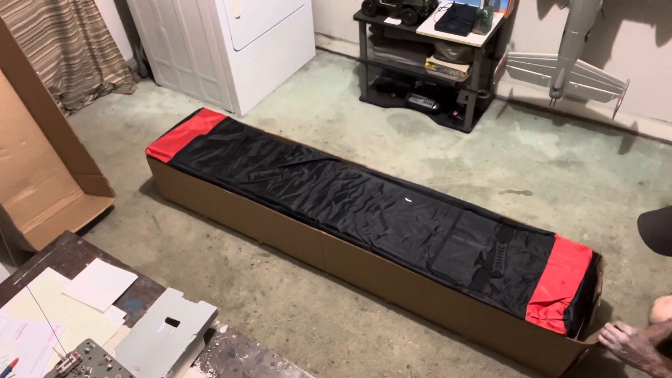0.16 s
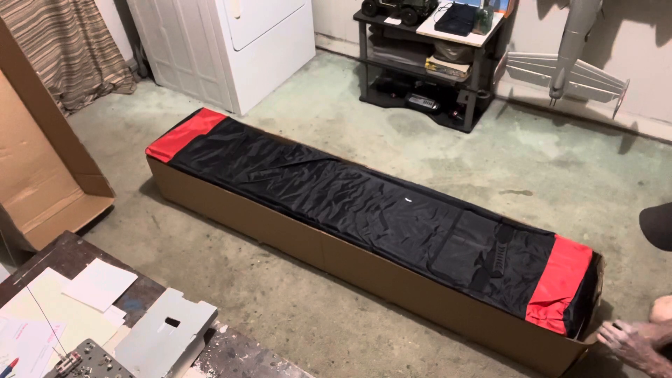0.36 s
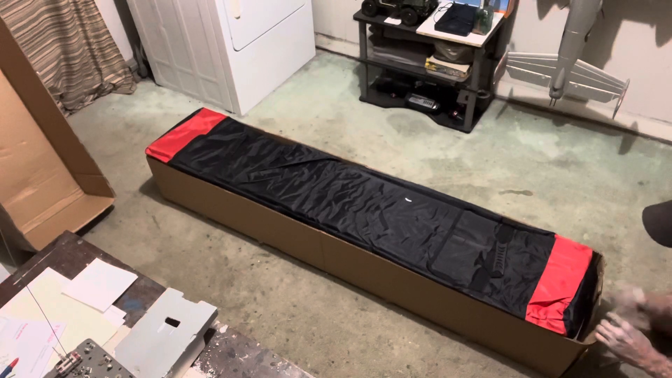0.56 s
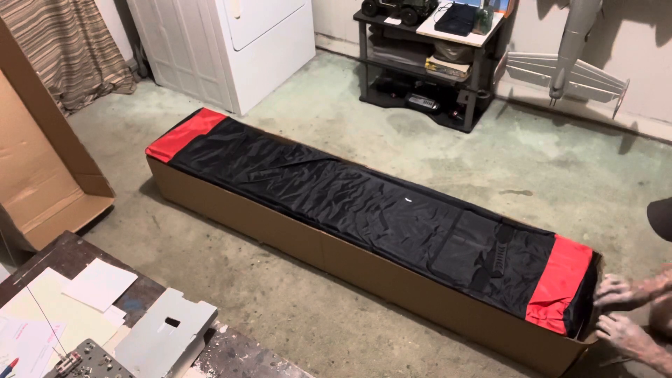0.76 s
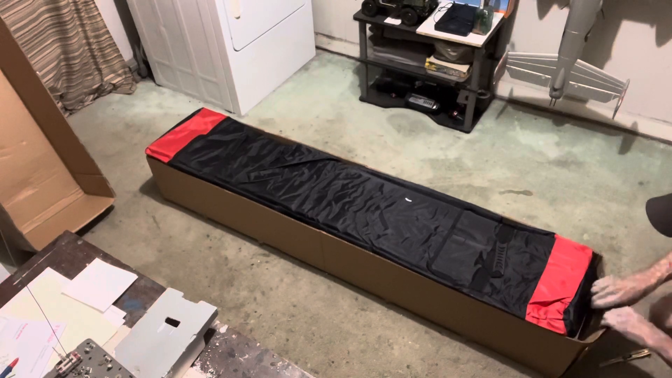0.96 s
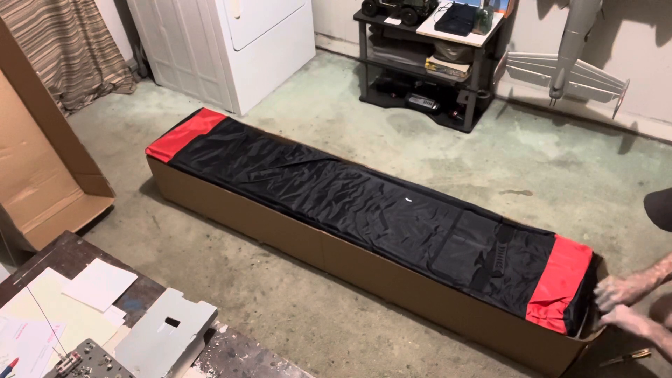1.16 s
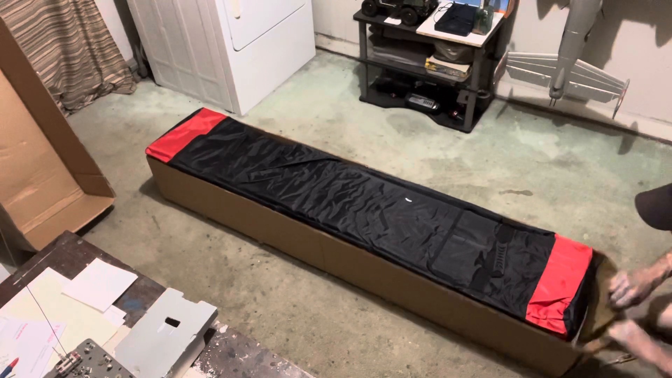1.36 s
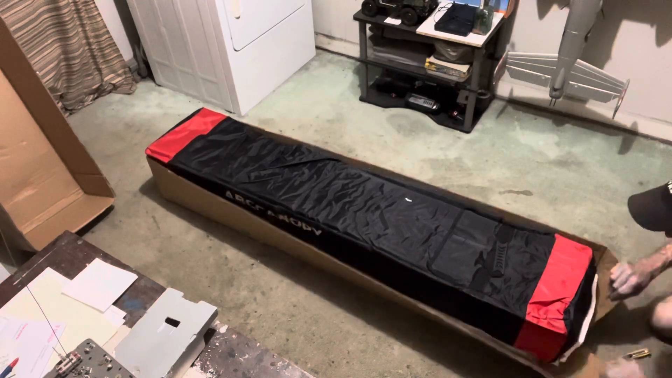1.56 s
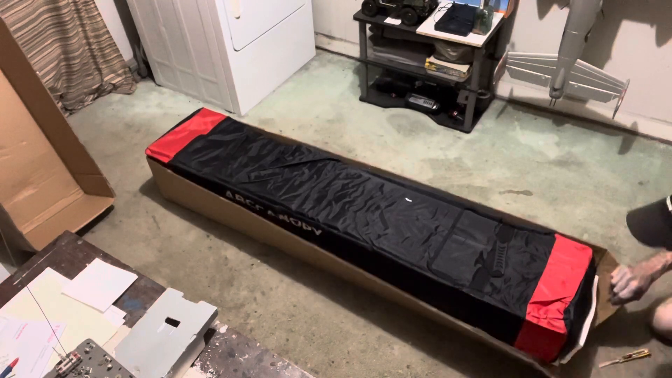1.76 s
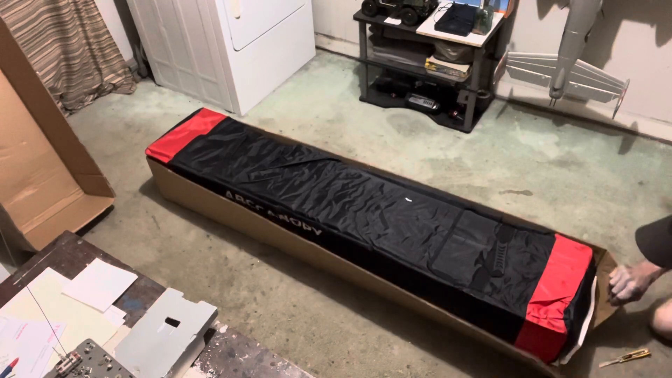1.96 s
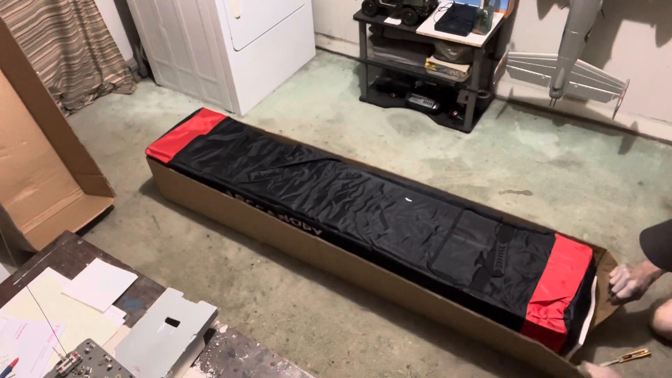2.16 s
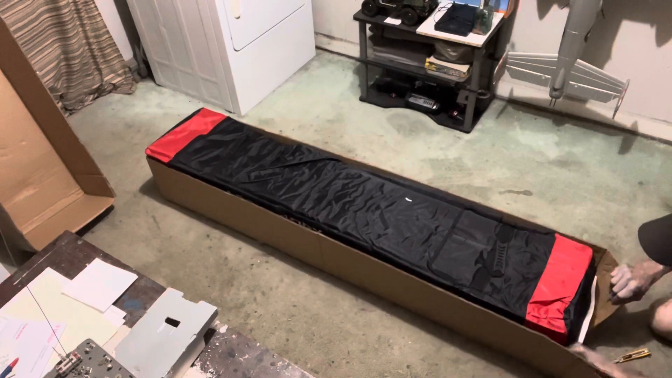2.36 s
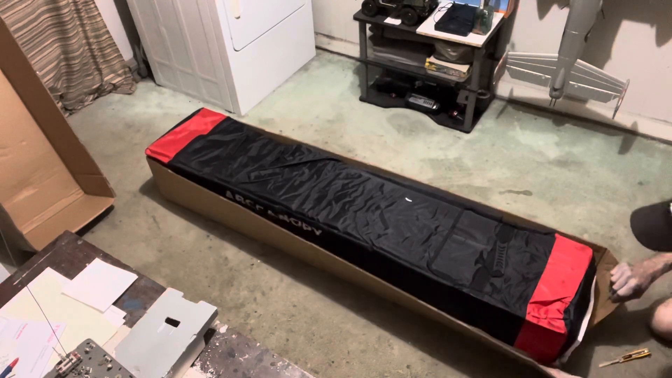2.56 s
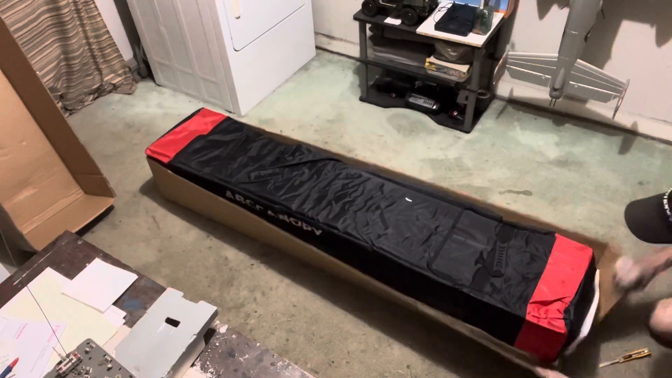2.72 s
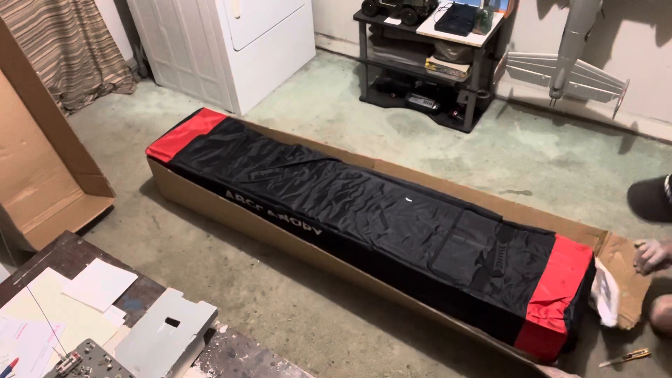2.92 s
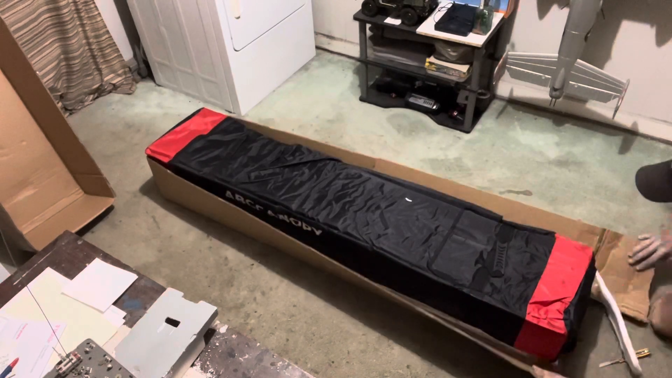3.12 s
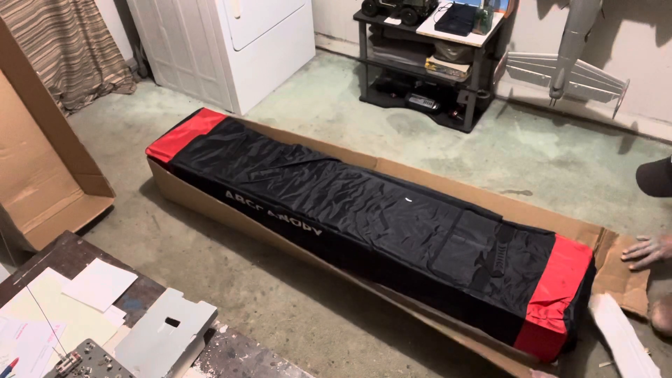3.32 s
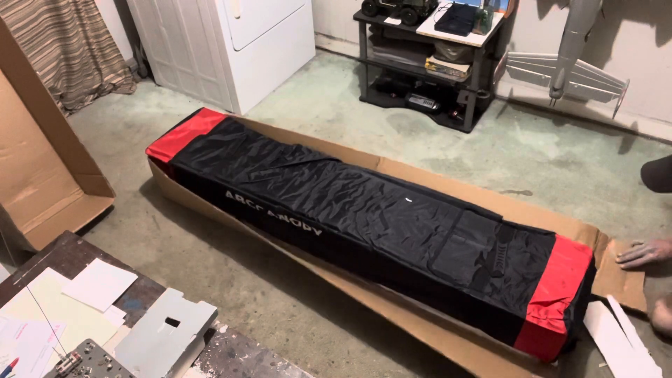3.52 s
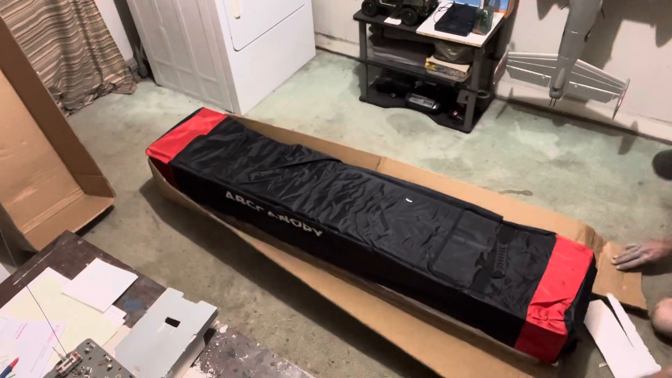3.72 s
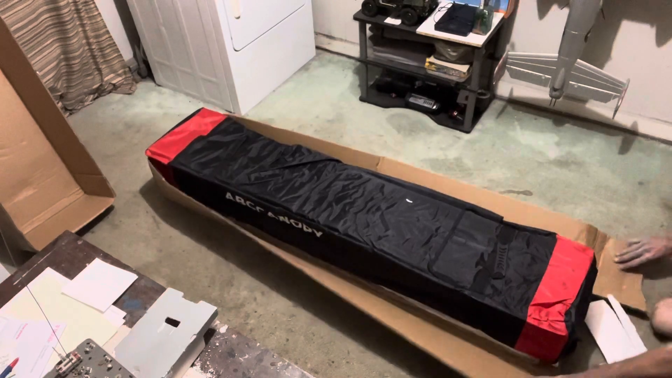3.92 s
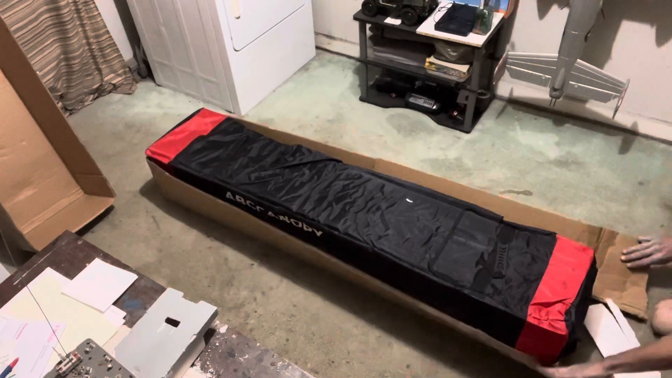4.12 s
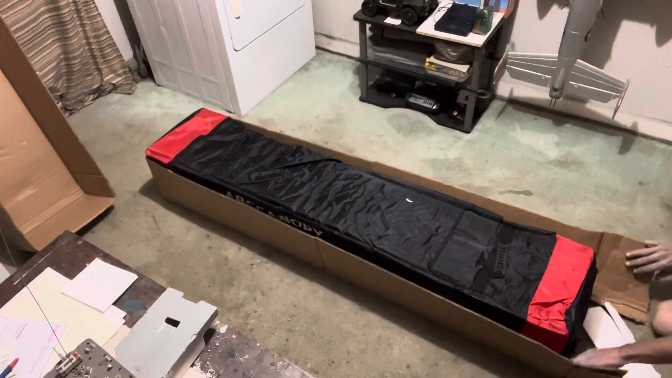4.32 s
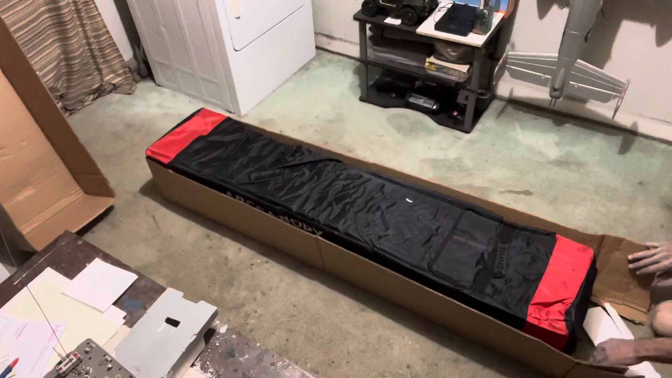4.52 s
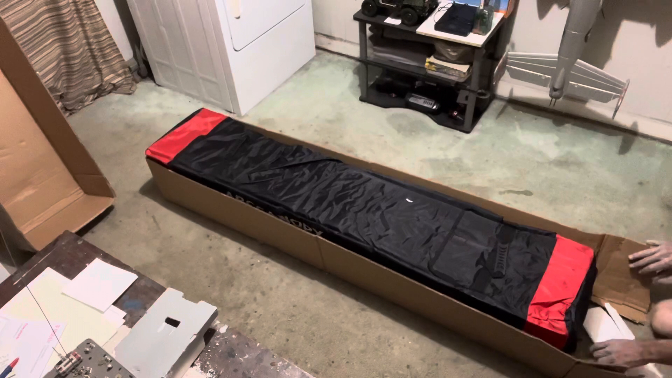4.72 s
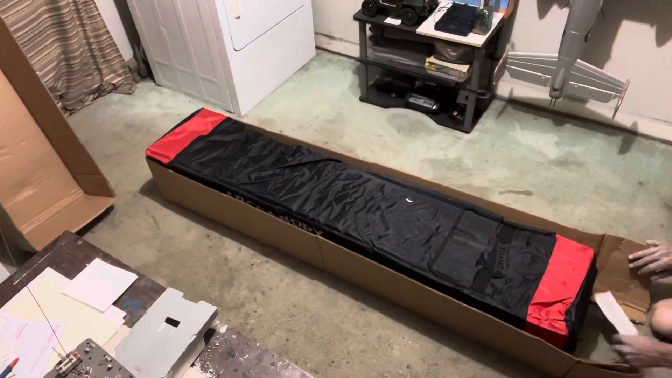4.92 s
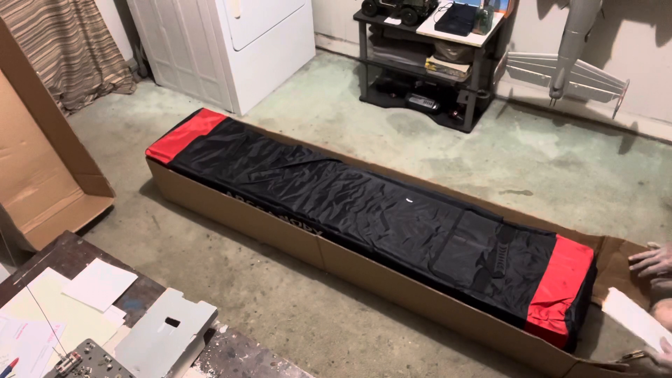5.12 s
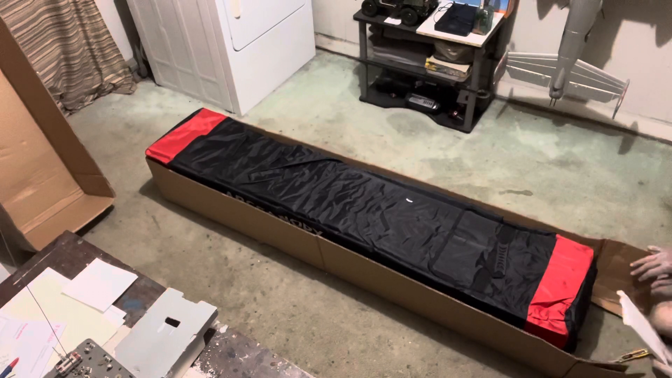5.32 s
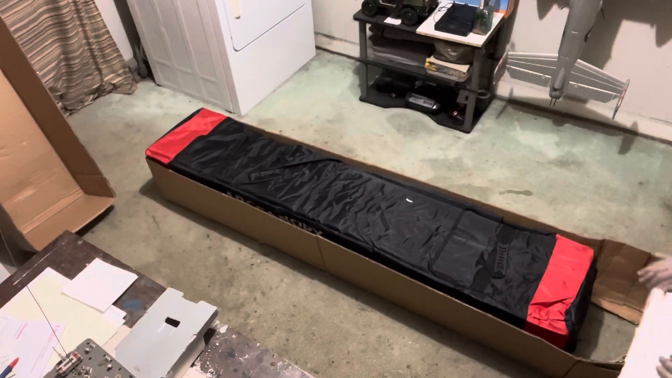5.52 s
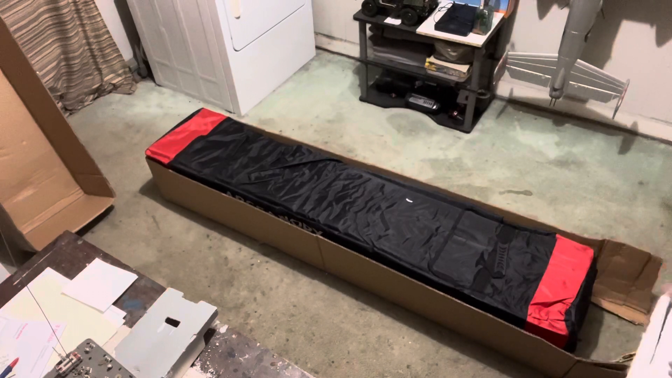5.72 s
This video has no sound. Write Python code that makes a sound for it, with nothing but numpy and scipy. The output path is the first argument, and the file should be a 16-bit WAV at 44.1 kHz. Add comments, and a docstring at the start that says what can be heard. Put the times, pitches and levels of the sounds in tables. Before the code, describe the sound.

A heavy long carton is pulled open on a concrete floor. Small slips and knocks build to a rough, boomy rip with rapid cracks, then quiet shuffling, one hard snap and deep floor thump, and afterwards scattered soft scrapes and dry papery snaps. Short garage echo, low steady room hum, close stereo pickup of a handheld kind.

```python
"""Hands tear open and fold back the end of a long cardboard box on a garage floor.
Small random slips make the fibres rasp and the board boom; single sharp steps make fibre, tape and foam snap.
Filtered noise swells as the box rocks and drags, and low fading tones are its end dropping on the floor.
Added reflections give the garage its echo, and slowly wavering noise is its low hum.
Two microphone ports hear the scene, the right one first over most of the pitch range."""
import sys
import numpy as np
from scipy import signal
from scipy.fft import rfft, irfft
from scipy.io import wavfile
from scipy.ndimage import uniform_filter1d

SR = 44100
rng = np.random.default_rng(int(sys.argv[2]) if len(sys.argv) > 2 else 0)


def generate_wav(sig):
    """Save sig (samples, or channels by samples) to the path in sys.argv[1] as 16-bit PCM at SR."""
    pcm = np.round(np.clip(np.atleast_2d(sig).T, -1, 1) * 32767).astype(np.int16)
    wavfile.write(sys.argv[1], SR, pcm)


N = 254898  # length of the scene [samples]


def gain_of(db):
    """Turns decibels into a factor for the sound pressure."""
    return 10 ** (np.asarray(db) / 20)


def evened(x):
    """Scales a signal so that its average strength (rms) is 1."""
    return x / np.sqrt(np.mean(x ** 2) + 1e-20)


def read(points, hz):
    """Reads a table between its points, on a log-frequency axis as the ear hears pitch."""
    f, value = np.transpose(points)
    return np.interp(np.log(hz + 1), np.log(f + 1), value)


def peaks(modes, hz):
    """Resonances each pass a narrow band of pitches; their powers add up."""
    power = sum(gain_of(2 * db) / (1 + (2 * (hz - f) / width) ** 2) for f, width, db in modes)
    return np.sqrt(power)


def split(hz, edge_hz, upper):
    """Shares the power between the part over an edge and the part under it."""
    share = 1 / (1 + (edge_hz / (hz + 1)) ** 4)
    return np.sqrt(share if upper else 1 - share)


def colour(x, gain):
    """Filters with the tone curve gain(hz); the response starts at once and has a total power of 1."""
    log_gain = np.log(gain(abs(np.fft.fftfreq(8192, 1 / SR))) + 1e-5)
    # the minimum-phase response: nothing sounds ahead of its cause
    spectrum = np.exp(np.conj(signal.hilbert(log_gain)))
    taps = np.fft.ifft(spectrum).real[None, :4096]
    return signal.oaconvolve(x, taps / np.linalg.norm(taps), axes=1)[:, :N]


def grains(per_s, spread_db, clump_db, clump_s):
    """Slips of random size come in clumps; two rows, for two unrelated ways to the microphone."""
    size = gain_of(spread_db * np.minimum(rng.exponential(1, N), 5))
    slips = size * (rng.random(N) < per_s / SR)
    window = np.hanning(round(clump_s * SR) + 3)
    clumps = evened(signal.oaconvolve(rng.standard_normal(N), window, "same"))
    return evened(slips * gain_of(clump_db * clumps) * rng.standard_normal((2, N)))


def bending(x, patchy_db, bins, frames):
    """As the sheet bends, its sound grows and fades in random patches of time and pitch."""
    z = signal.stft(x, nperseg=1024, noverlap=768)[2]
    patches = rng.standard_normal(z.shape[1:])
    patches = uniform_filter1d(patches, bins, 0)
    patches = evened(uniform_filter1d(patches, frames, 1))
    flicker = evened(gain_of(patchy_db * patches))
    return signal.istft(z * flicker, nperseg=1024, noverlap=768)[1][:, :N]


def stroke(start, rise, hold, fade):
    """A pull rises, holds and fades at a steady rate; gives the samples it covers and its gain."""
    end = start + rise + hold + 60 / fade  # when it has faded by 60 dB
    on = slice(max(round(start * SR), 0), min(round(end * SR), N))
    age = np.arange(on.stop - on.start) / SR
    up = np.minimum(age / max(rise, 1e-3), 1) ** 0.97  # a nearly straight rise
    return on, up * gain_of(-fade * np.maximum(age - rise - hold, 0))


def add_strokes(power):
    """Each pull of the hands drives the fibres and the board together."""
    # strokes of the hands: (start [s], rise [s], hold [s], fade [dB per s], dull fibre rasp [dB],
    # bright rasp over dull rasp [dB], slack board [dB], taut board [dB]), levels before colouring and mixing
    strokes = [(0.0, 0.00079, .0, 314, -46, -0.5, -41, -52.5), (0.374, 0.052, 0.15, 400, -66, 11, -62, -82),
               (0.627, 0.016, 0.024, 114, -56, -4, -49, -57),
               (0.78, 0.17, 0.038, 80, -58.5, 5, -55.5, -56.5),
               (1.08, .012, 0.0018, 159, -52.5, -2.5, -56, -61),
               (1.186, 0.008, 0.012, 159, -53, -4, -51, -57),
               (1.272, .012, 0.0064, 350, -35.5, -27, -26.5, -29),
               (1.298, 0.082, 0.11, 100, -40, -5, -30.5, -30.5),
               (1.397, 0.098, 0.06, 111, -34, -1.5, -34, -30.5),
               (1.738, 0.047, 0.0048, 243, -61, -7, -80, -67),
               (1.855, 0.0094, 0.068, 43, -63.5, -3, -75, -64.5),
               (1.922, 0.13, 0.046, 59, -59, 3.5, -55, -68), (2.309, 0.024, 0.069, 73, -54.5, 2, -47, -53),
               (2.5, .05, 0.2, 97, -68.5, 2, -65, -67), (2.671, 0.021, 0.17, 219, -47.5, 5.5, -46.5, -39),
               (2.697, 0.0033, 0.0086, 135, -27, -4.5, -54, -15.5),
               (2.712, 0.02, 0.031, 108.5, -55.5, -6.5, -38, -35),
               (2.965, .03, 0.057, 162, -48.5, 2.5, -44.5, -41),
               (3.155, 0.0062, 0.045, 120, -49.5, 8.5, -49, -41.5),
               (3.364, 0.03, 0.0015, 204, -51.5, 1, -57, -47),
               (3.393, 0.034, 0.32, 60, -63, 5, -60.5, -58.5),
               (3.622, .15, 0.049, 56, -54.5, 3, -53.5, -47),
               (3.947, 0.015, 0.28, 50, -61.5, 1, -59.5, -61.5),
               (4.705, 0.043, 0.01, 112, -57.5, 11.5, -67.5, -48.5),
               (4.799, 0.063, 0.082, 139, -60, 7, -79, -86),
               (5.032, 0.037, 0.0039, 98.5, -65.5, 6, -65, -87),
               (5.105, .02, 0.1, 40, -62.5, 2.5, -70, -75),
               (5.386, 0.023, 0.032, 182, -52, 5.5, -46.5, -66),
               (5.505, 0.01, 0.011, 248, -44, 1, -66, -52), (5.603, 0.016, 0, 92, -63, 5.5, -60.5, -68)]
    for *shape, rasp_db, bright_db, slack_db, taut_db in strokes:
        on, gain = stroke(*shape)
        levels = gain_of([rasp_db, rasp_db + bright_db, slack_db, taut_db])
        power[:4, on] += (levels[:, None] * gain) ** 2


def add_shoves(power):
    """Each shove rocks the box on the floor in one smooth swell of drag."""
    # shoves: (middle [s], length [s], level before mixing [dB])
    shoves = [(0.055, 0.22, -43), (.45, 0.28, -49), (.67, 0.12, -42.5), (.74, .07, -46.5),
              (.89, 0.11, -52.5), (.98, 0.094, -43), (1.13, .15, -50.5), (1.33, 0.12, -28.5),
              (1.42, 0.17, -34), (1.55, 0.18, -32.5), (2.08, 0.47, -49), (2.45, 0.11, -46),
              (2.76, 0.2, -35.5), (2.88, 0.16, -42), (3.05, 0.3, -46), (3.2, 0.21, -54), (3.5, 0.29, -53),
              (3.85, 0.2, -50.5), (5.14, 0.17, -55), (5.5, 0.17, -54)]
    t = np.arange(N) / SR
    for middle, length, db in shoves:
        on = slice(max(round((middle - length / 2) * SR), 0), round((middle + length / 2) * SR))
        swell = np.cos(np.pi * (t[on] - middle) / length) ** 2
        power[4, on] += (gain_of(db) * swell) ** 2


def thud():
    """The box end drops on the floor: low tones rise quickly and die away."""
    # drops: (time [s], pitch [Hz], level [dB], time to fade by 60 dB [s])
    drops = [(0.007, 60.9, -27, 0.45), (2.733, 73.5, -25.5, 0.36)]
    out = np.zeros(N)
    age = np.arange(SR) / SR
    for s, hz, db, t60 in drops:
        rise = np.minimum(age / 0.0093, 1)
        ring = gain_of(db - 60 * age / t60) * np.sin(2 * np.pi * hz * age)
        out[round(s * SR):][:SR] += rise * ring
    return out


def hum():
    """Low room tone: coloured noise whose level wavers slowly."""
    # tone of the hum: (pitch [Hz], relative level [dB])
    tone = [(15, -36), (25, -27), (38, -11.5), (74, -1), (108, -11), (235, -9.5), (258, -12), (334, -10),
            (454, -16.5), (549, -17.5), (711, -45.5), (7000, -44), (9100, -104), (15400, -120)]
    waver = evened(uniform_filter1d(rng.standard_normal(N), size=6000))
    noise = colour(rng.standard_normal((2, N)), lambda hz: gain_of(read(tone, hz)))
    return gain_of(-58 + 0.76 * waver) * noise


def add_snaps(power):
    """A snap is a one-sample crack, fraying fibres, and a knock that rings and shakes the board."""
    # snaps of fibre, tape and foam, levels before colouring and mixing: (time [s], dull crack [dB],
    # bright crack over dull crack [dB], board knock [dB], knock pitch [Hz], knock time to fade by 60 dB [s])
    snaps = [(0.443, -52, 17, -57, 530, .06), (0.6327, -35.5, -29, -56, 735, .06),
             (0.658, -60, -10, -47, 277, 0.081), (1.0881, -32, -20, -59, 630, 0.035),
             (1.1908, -35, -9, -57, 476, 0.065), (1.2849, -21.5, -3.5, -16.5, 698, 0.049),
             (1.335, -17, -19, -12, 937, 0.016), (1.352, -38, -12, -24, 344, 0.025),
             (1.3716, -31, -1.5, -22.5, 413, 0.037), (1.4721, -15, -7, -19.5, 559, 0.047),
             (1.4915, -26, -16, -10, 705, 0.03), (1.515, -30, -10, -12.5, 750, 0.024),
             (1.525, -21, 2, -8.5, 330, 0.021), (1.546, -24, 0, -10.5, 350, 0.017),
             (1.8583, -33.5, -33, -69, 546, 0.068), (2.3288, -37.5, -0.5, -61, 620, 0.082),
             (2.6998, -45, 15, -15.5, 718, 0.041), (2.722, -30, -5, -23.5, 593, 0.082),
             (2.9701, -35.5, 0.5, -42, 600, 0.069), (3.1614, -35, 2, -37, 1057, 0.28),
             (3.188, -50, 0, -36.5, 647, .08), (3.3831, -33, 10, -63, 865, .06),
             (3.663, -35, -27, -50, 486, 0.049), (3.7456, -37, -3, -54, 1080, .08),
             (3.8067, -49, -10, -49, 493, 0.075), (3.9924, -30, -6, -43, 643, 0.094),
             (4.126, -53, 12, -64, 640, .06), (4.2397, -75, -26, -44.5, 252, 0.064),
             (4.525, -45.5, -6.5, -56.5, 521, .06), (4.747, -46, 11, -47.5, 752, 0.094),
             (4.8723, -43.5, 10.5, -61, 490, .06), (4.9256, -43, 3.5, -78, 482, .06),
             (4.957, -45, 6.5, -79, 500, .06), (5.188, -51, 8.5, -65, 585, .06),
             (5.401, -36, 10, -40.5, 601, .1), (5.4237, -27, 2.5, -48, 487, .1),
             (5.5183, -19, -5, -55, 696, .06), (5.617, -41.5, -3, -58, 533, 0.068)]
    # fibres keep parting after a crack: (dull part [dB], bright part [dB]), relative to the crack
    fray_db = [-18.5, -5]
    # the knock shakes the board: (slack board [dB], taut board [dB]), relative to the knock
    shake_db = [-6, -2.5]
    fray_t60_s, shake_longer = 0.066, 1.78  # the shake lasts this many times as long as the knock
    knock_rise_s, slack_rise_s = 0.00095, 0.02  # slack board is slower to move
    breaks, rings = np.zeros((2, N)), np.zeros(N)
    for s, crack_db, bright_db, knock_db, hz, t60 in snaps:
        on = slice(round(s * SR), min(round(s * SR) + 12000, N))
        age = np.arange(on.stop - on.start) / SR
        crack = gain_of([crack_db, crack_db + bright_db])
        breaks[:, on.start] = crack
        fray = (crack * gain_of(fray_db))[:, None] * gain_of(-60 * age / fray_t60_s)
        power[:2, on] += fray ** 2
        rise = 1 - np.exp(-age / knock_rise_s)
        slack_rise = 1 - np.exp(-(age / slack_rise_s) ** 2)
        shake = gain_of(np.add(shake_db, knock_db))[:, None] * gain_of(-60 * age / (shake_longer * t60))
        power[2:4, on] += [slack_rise, rise] * shake ** 2
        rings[on] += rise * gain_of(knock_db - 60 * age / t60) * np.sin(2 * np.pi * hz * age)
    return breaks, rings


def ticks():
    """The dry tick of a single crease is a few cycles of a high tone that die at once."""
    # ticks of creases: (time [s], level before mixing [dB], pitch [Hz])
    creases = [(2.701, -8.5, 6950), (3.5216, -30.5, 9600), (3.5963, -33, 9800), (3.604, -33, 9720),
               (3.7246, -27.5, 8850), (3.7436, -30, 11100), (3.7628, -33.5, 2940), (3.8095, -30, 11000),
               (4.2982, -40.5, 4040), (4.7471, -16.5, 11200), (5.4008, -18, 11300), (5.4239, -16.5, 10000)]
    out, age = np.zeros(N), np.arange(100) / SR
    for s, db, hz in creases:
        ring = np.exp(-age * hz / 2.6) * np.sin(2 * np.pi * hz * age)
        out[round(s * SR):][:100] += gain_of(db) * ring
    return out


def efforts():
    """Strokes, shoves and snaps add their powers to a faint creep that never stops."""
    # creep between strokes, before mixing:
    # (dull rasp [dB], bright rasp [dB], slack board [dB], taut board [dB], drag [dB])
    rest_db = [-84, -82, -71.5, -72, -57.5]
    power = gain_of(rest_db)[:, None] ** 2 * np.ones(N)
    add_strokes(power)
    add_shoves(power)
    breaks, rings = add_snaps(power)
    gains = np.sqrt(uniform_filter1d(power, size=9, axis=1) + 1e-18)
    return gains, breaks, rings


def fibre_gain(hz, upper):
    """Tone of parting fibres: the duller or the brighter part of the rasp."""
    # rasp of the fibres: (pitch [Hz], relative level [dB])
    rasp_tone = [(1000, -17), (1800, -11), (2450, -4), (2900, -1), (4500, -4), (6500, 0.5), (8500, -0.5),
                 (11000, 1), (13000, -11), (16000, -3.5)]
    return gain_of(read(rasp_tone, hz)) * split(hz, 4400, upper)


def board_gain(hz, upper):
    """Panel resonances over a spread of damped ones; a slack panel sounds low, a taut one high."""
    # panel resonances: (pitch [Hz], width [Hz], relative level [dB])
    panel = [(181, 55, 4.5), (275, 39, 0.5), (333.4, 8.4, 6.5), (385, 35, 2.5), (426, 92, 5.5),
             (556, 64, 1.5), (657, 54, 4), (753, 140, -3.5), (815, 36, -4), (922, 53, -3), (1073, 65, -1.5),
             (1403, 170, -10.5)]
    # overall tone of the board: (pitch [Hz], relative level [dB])
    spread = [(100, -29.5), (200, 3.5), (450, -4), (900, -0.5), (1300, 2), (1600, 2.5), (2300, 6),
              (4000, -43.5)]
    return gain_of(read(spread, hz)) * (0.17 + peaks(panel, hz)) * split(hz, 408, upper)


def rock_gain(hz):
    """Resonances of the loaded box rocking on the floor, squared to make them stand out more."""
    # rocking box: (pitch [Hz], width [Hz], relative level [dB]), width and level before squaring
    rocking = [(57.6, 17, -3), (81, 53, -7.5), (137.9, 26, -6)]
    return (peaks(rocking, hz) * split(hz, 34, True)) ** 2


def box():
    """Fibre slips give the rasp, coarser slips ring the board, drag shakes the whole box."""
    gains, breaks, rings = efforts()
    rasp, board = 0, 0
    for k in range(2):  # first dull rasp and slack board, then bright rasp and taut board
        fibres = grains(per_s=14000, spread_db=1.75, clump_db=1.54, clump_s=0.025)
        fibres = bending(fibres, 2.5, bins=6, frames=7)
        rasp = rasp + colour(gains[k] * fibres + breaks[k], lambda hz: fibre_gain(hz, k))
        slips = grains(per_s=4000, spread_db=1.66, clump_db=2.48, clump_s=0.036)
        slips = bending(slips, 2.8, bins=2, frames=8)
        board = board + colour(gains[2 + k] * slips, lambda hz: board_gain(hz, k))
    rock = colour(gains[4] * rng.standard_normal((2, N)), rock_gain)
    return gain_of(3.0) * rasp + gain_of(-1.85) * board + gain_of(-1.5) * rock + rings + ticks()


def garage(x):
    """The garage sends the sound back: noise after a short gap, each band dying at its own speed."""
    # echo of the garage: (pitch [Hz], time to fade by 60 dB [s])
    echo = [(100, 0.33), (500, 0.18), (2000, 0.062), (6000, 0.083), (14000, 0.12)]
    hz, t, z = signal.stft(rng.standard_normal((2, SR // 2)), SR, nperseg=256)
    fade = gain_of(-60 * t / read(echo, hz)[:, None])
    tail = signal.istft(z * fade, SR, nperseg=256)[1]
    tail[:, :200] = 0  # the gap
    return signal.fftconvolve(x, tail / np.linalg.norm(tail[0]), axes=1)[:, :N]


def ports(first, second):
    """The right port hears part of the left sound early, and unrelated scattered sound for the rest."""
    # head start of the right port: (pitch [Hz], phase lead [radians])
    lead_points = [(0, 0.0), (250, 0.6), (600, 1.5), (1300, 1.44), (2500, 3.5), (3300, 4), (6000, 7.5),
                   (8350, 9), (10300, 13.5), (12450, 15), (14600, 18.5), (17000, 4.5)]
    # likeness of the ports: (pitch [Hz], share of the left sound in the right [0 to 1])
    likeness = [(50, .998), (120, .95), (250, .76), (600, .62), (1200, .62), (2600, .55), (4000, .5),
                (6500, .55), (8000, .92), (16000, .95)]
    # balance of the ports: (pitch [Hz], left over right [dB])
    balance = [(25, -8.5), (70, 3.5), (150, 0.5), (380, 1.5), (950, -1.5), (2380, 1.5), (5980, 3),
               (15000, -1.5)]
    hz = np.fft.rfftfreq(N, 1 / SR)
    same = np.clip(read(likeness, hz), 0, 1)
    lead = np.exp(1j * np.interp(hz, *np.transpose(lead_points)))
    left = rfft(first)
    right = same * lead * left + np.sqrt(1 - same ** 2) * rfft(second)
    lean = gain_of(read(balance, hz) / 2)  # half the balance goes to each side
    return irfft(np.array([left * lean, right / lean]), N)


def scene():
    """The box with its reflections, over the hum; the thuds reach both ports alike."""
    near = box()
    heard = gain_of(-1.5) * near + gain_of(-9) * garage(near) + hum()
    return ports(*heard) + thud()


def record(dry):
    """The loudest peaks are softly rounded off; then the highest treble is cut."""
    ceiling = 0.6
    rounded = ceiling * np.tanh(dry / ceiling)
    taps = signal.firwin(511, 15950, window=("kaiser", 9), fs=SR)[None]  # cut above 15950 Hz
    return signal.oaconvolve(rounded, taps, "same")


dry = scene()
out = record(dry)
generate_wav(out)
```